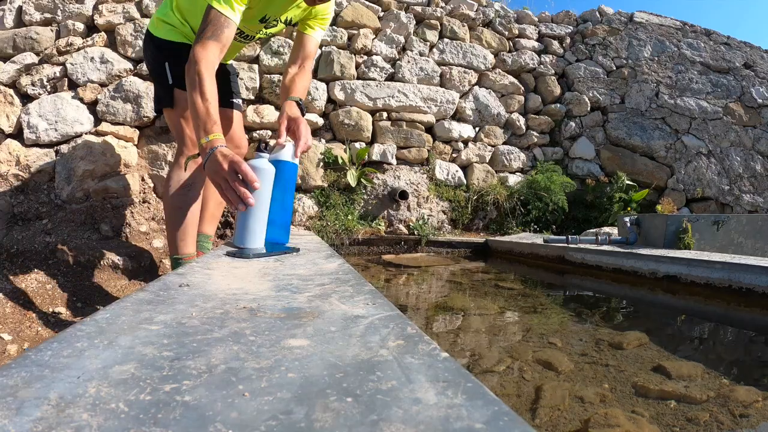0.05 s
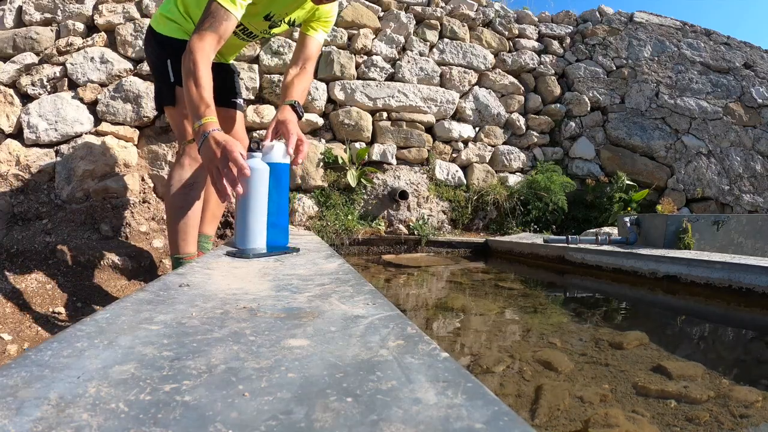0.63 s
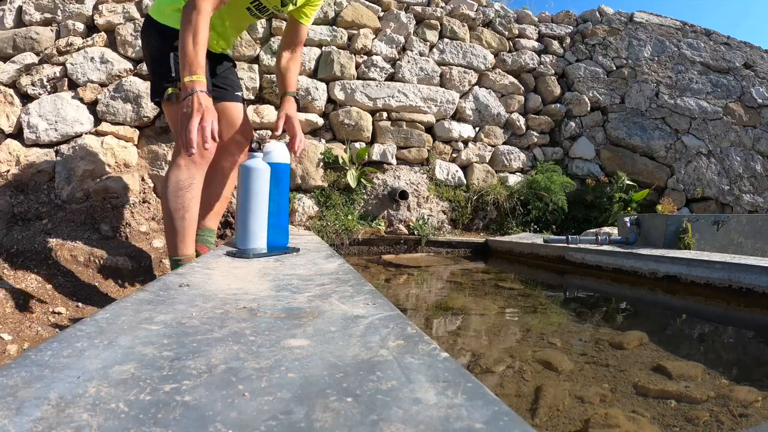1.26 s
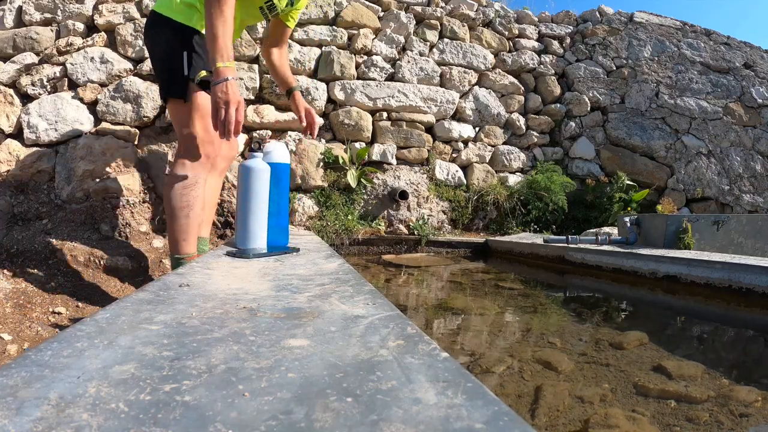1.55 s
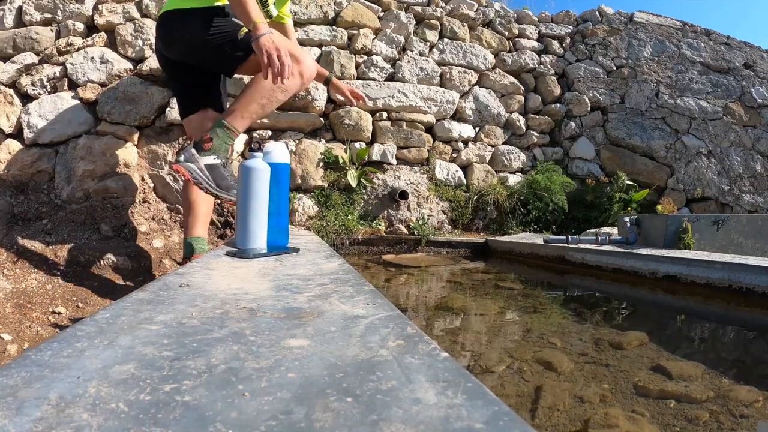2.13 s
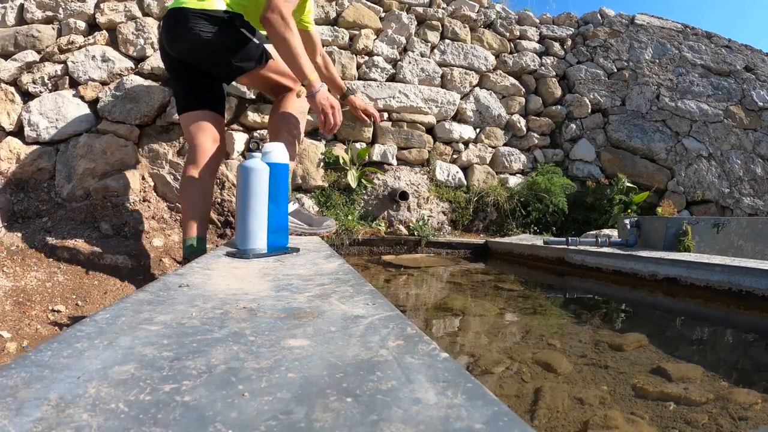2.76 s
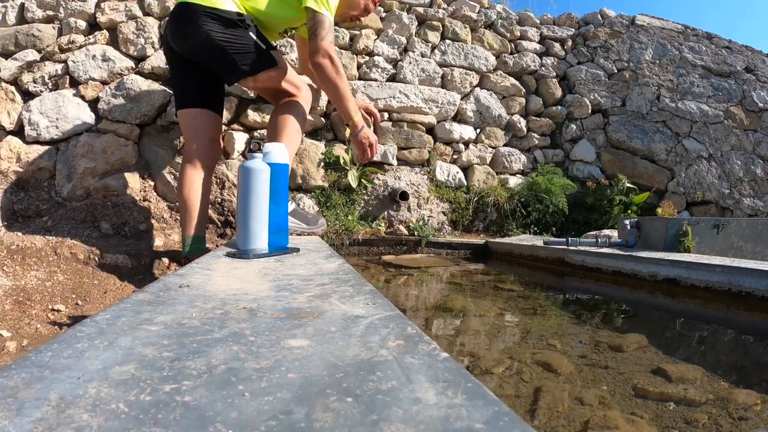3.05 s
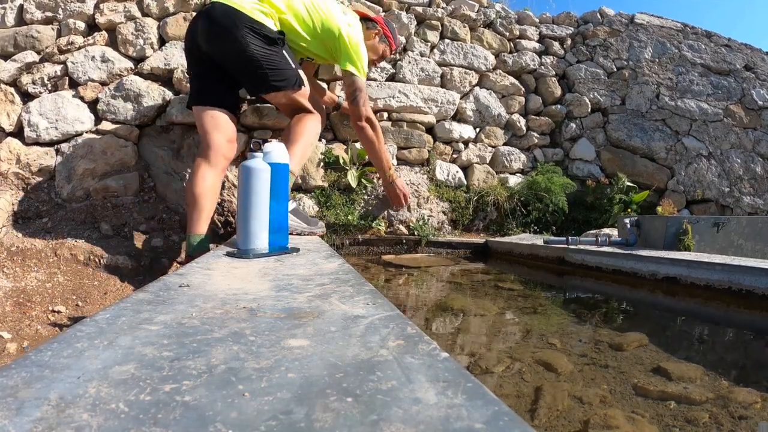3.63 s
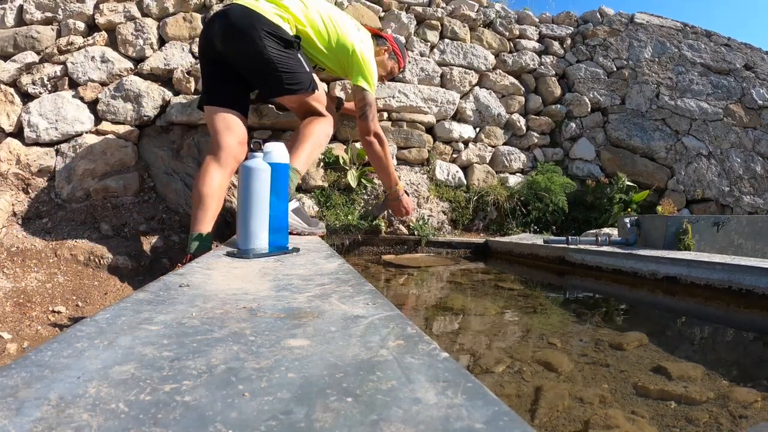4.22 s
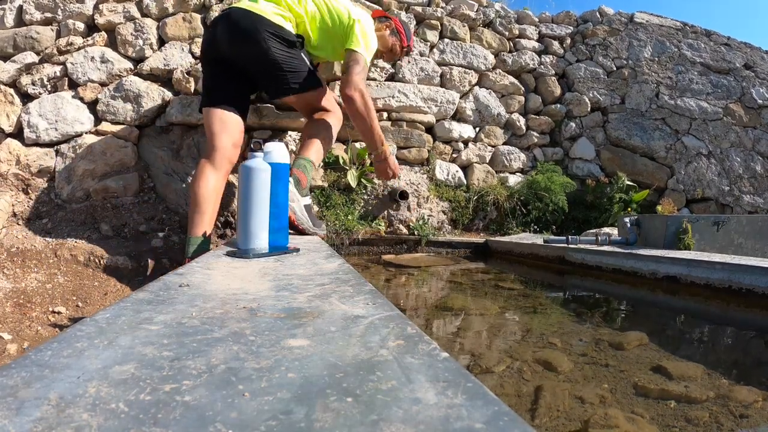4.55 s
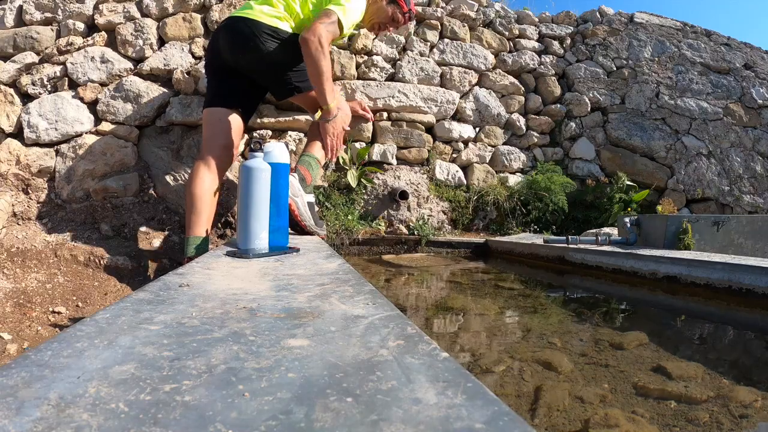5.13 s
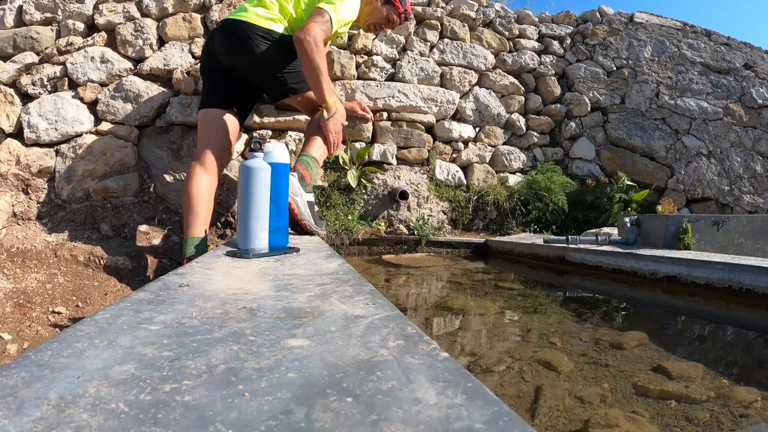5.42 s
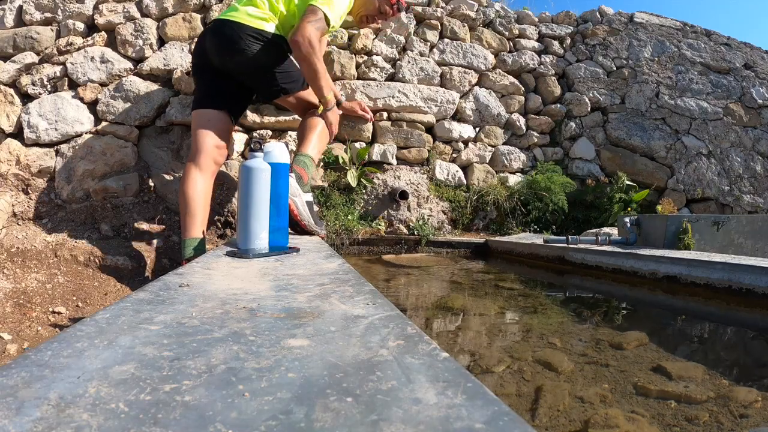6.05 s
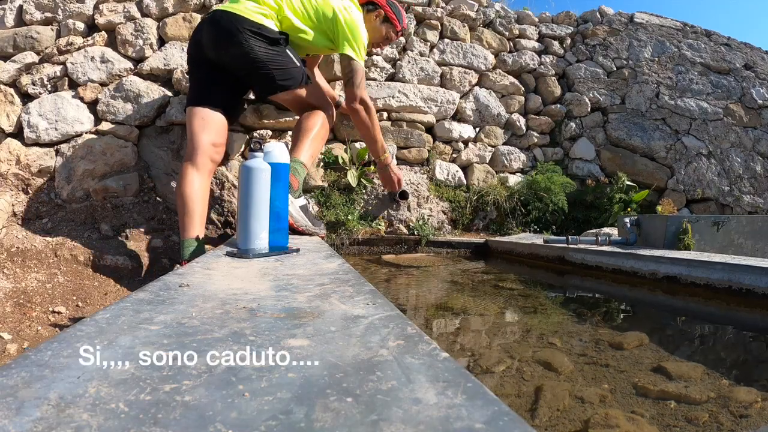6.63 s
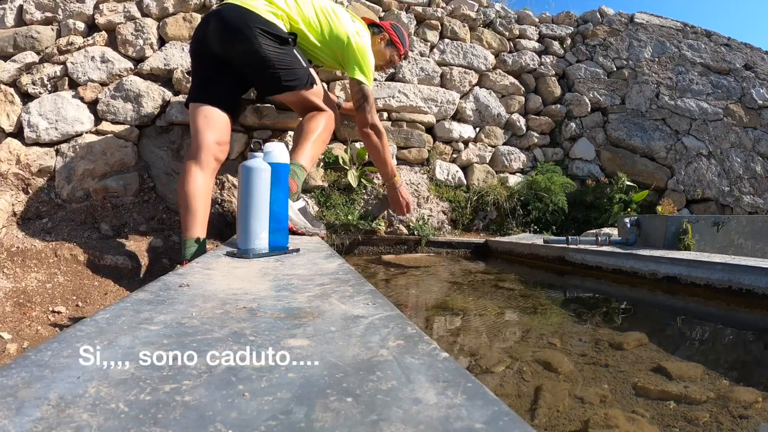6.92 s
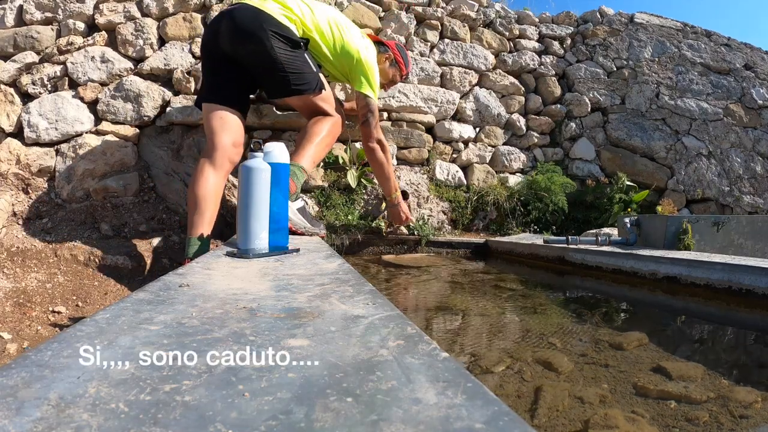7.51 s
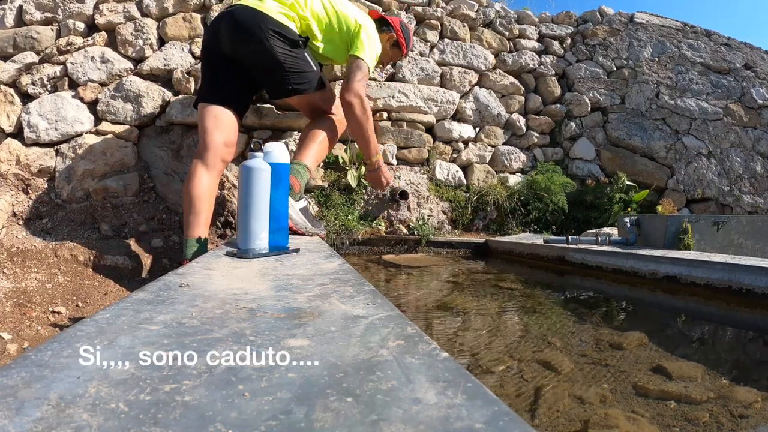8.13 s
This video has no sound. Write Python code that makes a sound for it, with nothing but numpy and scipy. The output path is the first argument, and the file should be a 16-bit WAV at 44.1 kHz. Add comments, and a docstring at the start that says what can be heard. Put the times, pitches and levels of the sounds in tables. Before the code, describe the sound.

Bottles knock and clink outdoors, then a thin stream splashes into a pool, twice interrupted by a cupped hand.

```python
"""A spring spouts from a stone wall into a basin: trapped air gurgles, drops plop, tiny bubbles fizz.
Twice the stream smacks into a cupped hand and sinks to a dribble.
At the start a bottle is set on the basin's rim, clinks against a second one and rocks. Later a shoe
scuffs, and there are two short squeaks over dull thuds, the second with a faint repeat.
Light wind buffets the microphone, which stands on the rim."""
import sys
import numpy as np
from scipy import signal
from scipy.fft import rfft, irfft, next_fast_len
from scipy.io import wavfile
from scipy.ndimage import map_coordinates

SR = 44100
rng = np.random.default_rng(int(sys.argv[2]) if len(sys.argv) > 2 else 0)


def store_wav(level_fs):
    """Save 16-bit WAV to argv[1]."""
    pcm = np.round(np.clip(np.atleast_2d(level_fs), -1, 1) * 32767)
    wavfile.write(sys.argv[1], SR, pcm.T.astype(np.int16))


N = 369116
T = np.arange(N) / SR

# Levels in the tables are relative: the functions add gains of their own.
# the stream falls freely on the pool: start_s, end_s, level_db
FREE_POURS = [(-.3, 3.766, -55.5), (4.64, 6.9, -55), (8.31, 8.6, -57)]
# the jet falters for a moment: middle_s, change_db
JET_LULLS = [(.88, -7.5), (1.247, -15.5), (2.01, -13), (2.659, -3)]
# tone colour of the splash: frequency_hz, level_db
SPLASH_COLOUR = [(250, -18.5), (450, 4.5), (900, 7.5), (1500, -3.5), (2400, 4), (3500, 0.5), (5000, -3.5),
                 (6500, -9), (7900, -15.5), (9500, -18), (12000, -43), (15500, -68)]
# tone colour of the spray and of the fine hiss: frequency_hz, level_db
HISS_COLOUR = [(1000, -24), (4000, 0.5), (7000, 11.5), (8200, 4.5), (10000, 2.5), (13000, -6),
               (15500, -12.5)]
# a fine, high hiss swells and fades: start_s, length_s, level_db
HISS_SWELLS = [(2.4, 0.2, -68), (2.93, 0.091, -63), (4.49, 0.2, -65), (4.87, 0.45, -68.5),
               (5.3, 0.39, -68.5), (5.8, 0.45, -65), (8.1, 0.52, -75)]
# air pockets close under the jet: start_s, length_s, level_db, first_pitch_hz, last_pitch_hz
AIR_POCKETS = [(0.233, 0.041, -51, 446, 920), (0.362, 0.021, -36.5, 727, 1080),
               (0.753, 0.02, -39, 750, 990), (0.801, 0.054, -46, 526, 1050), (1.12, 0.025, -44.5, 418, 516),
               (1.154, 0.039, -42, 455, 1110), (1.301, 0.023, -48, 549, 1110),
               (1.406, 0.052, -49, 449, 843), (1.485, 0.072, -45.5, 553, 943),
               (1.674, 0.051, -45, 447, 1100), (1.814, 0.035, -49, 440, 1020), (2.16, 0.04, -43, 448, 1030),
               (2.23, 0.042, -49.5, 556, 850), (2.395, 0.042, -47.5, 413, 900),
               (2.742, 0.03, -44, 652, 910), (3.098, 0.041, -39, 394, 486), (3.448, 0.031, -41.5, 408, 423),
               (3.535, 0.031, -43, 628, 1070), (3.667, 0.017, -41, 715, 1110),
               (4.614, 0.045, -41.5, 436, 1120), (4.763, 0.056, -43.5, 404, 1300),
               (4.844, 0.019, -43.5, 635, 865), (4.916, 0.08, -43, 435, 1010),
               (5.015, 0.018, -46, 764, 1090), (5.154, 0.045, -55, 406, 431.4),
               (5.262, 0.041, -61, 554, 1170), (5.393, 0.057, -53.5, 404, 1330),
               (5.455, 0.0225, -45.5, 443, 470), (5.645, 0.041, -52, 510, 945),
               (5.771, 0.022, -38.5, 710, 1115), (5.867, 0.03, -47.5, 598, 860),
               (6.062, 0.043, -49, 439, 980), (6.205, 0.09, -54, 427, 824), (6.307, 0.081, -45.5, 572, 830),
               (6.429, 0.017, -45, 423, 620), (6.511, 0.055, -43, 426, 960),
               (6.664, 0.022, -51.5, 660, 1100), (6.854, 0.087, -50.5, 486, 1010),
               (8.181, 0.065, -51.5, 411, 613), (8.255, 0.057, -46, 450, 870),
               (8.296, 0.046, -36.5, 412.4, 910)]
# big drops hit the pool: start_s, level_db, pitch_hz, splat_db
BIG_DROPS = [(0.211, -38, 2450, -33.5), (0.303, -32, 4040, -62), (0.339, -34, 2390, -51),
             (0.756, -35, 900, -47), (0.941, -28, 5700, -49), (0.981, -30.5, 822, -35.5),
             (1.082, -32.5, 2290, -64), (1.357, -31.5, 5000, -58), (1.456, -28.5, 662, -50),
             (1.559, -32.5, 2300, -63), (1.569, -27, 1120, -60), (1.572, -37, 2190, -56),
             (1.576, -32.5, 1410, -56), (1.664, -31.5, 5880, -40), (1.741, -33, 3230, -54),
             (1.799, -31.5, 2480, -41), (1.822, -26, 3050, -34.5), (1.873, -34, 925, -38),
             (1.966, -31, 1014, -56), (2.128, -30, 5800, -36), (2.39, -35, 814, -54),
             (2.445, -28.5, 2680, -57), (2.479, -34, 2280, -37), (2.537, -29, 2300, -57),
             (2.587, -34, 1470, -35), (2.836, -30, 2900, -57), (3.254, -34.5, 3900, -36.5),
             (3.439, -29.5, 3030, -62), (3.773, -28, 2470, -45), (4.613, -24, 3040, -39),
             (4.683, -36.5, 880, -63), (4.788, -30.5, 3800, -56), (4.886, -27, 2590, -47),
             (4.938, -35, 5140, -54), (4.959, -28, 1640, -52), (5.28, -40, 820, -32.5),
             (5.386, -31, 2370, -43), (5.418, -31, 4080, -50), (5.537, -33.5, 827, -54),
             (5.575, -35, 2230, -60), (5.766, -26.5, 1600, -42), (5.931, -39, 1020, -35.5),
             (6.105, -26, 960, -68), (6.187, -34.5, 3040, -55), (6.246, -25.5, 3960, -30.5),
             (6.312, -34.5, 4100, -61), (6.332, -30.5, 2360, -59), (6.429, -33, 1190, -60),
             (6.436, -33.5, 1970, -64), (6.456, -31.5, 2330, -60), (6.479, -31.5, 1980, -58),
             (6.582, -37, 2330, -57), (6.704, -26.5, 2050, -65), (6.728, -33, 980, -62),
             (6.758, -32, 2170, -62), (6.794, -24.5, 2380, -58), (6.847, -24.5, 4050, -56),
             (6.863, -33.5, 2320, -61), (6.963, -32.5, 2300, -34.5), (7.168, -38.5, 1250, -45.5),
             (7.184, -31, 3535, -48), (8.123, -31, 5410, -49), (8.177, -35, 2410, -36),
             (8.191, -33.5, 3100, -46), (8.211, -29.5, 5140, -43)]
# short wet pops with a splutter, mostly as the hand meets the stream:
# start_s, level_db, pitch_hz, ring_cycles, splutter_db
WET_SMACKS = [(3.696, -32, 1130, 2, -42), (3.701, -26, 1690, 1, -35), (3.731, -26, 1130, 1.3, -38),
              (3.759, -25, 1090, 1.3, -34), (3.775, -28, 1380, 1, -36), (3.809, -10.5, 1410, 0.79, -37.5),
              (3.823, -22, 2100, 0.88, -43), (3.853, -17, 2050, .7, -49), (3.866, -23.5, 2000, 0.8, -41),
              (3.885, -13, 1830, 0.62, -40), (3.899, -14.5, 1040, 1.2, -37.5), (3.95, -24, 1060, 1.1, -41),
              (4.53, -25, 1270, 1.64, -62), (5.821, -30, 890, 1.7, -38.5), (7.004, -28.5, 980, 2.4, -35),
              (7.047, -44, 990, 2, -38), (7.057, -39.5, 990, 4.3, -46)]
# tone colour of the splutter after a smack: frequency_hz, level_db
SPLUTTER_COLOUR = [(300, -17), (650, -2.5), (1100, 0.5), (1700, -10.5), (2400, -4.5), (3500, -13),
                   (6000, -27), (12000, -54)]
# single drips get past the hand: start_s, level_db, pitch_hz, ring_cycles
HAND_DRIPS = [(4.136, -42.5, 2720, 18), (4.303, -52, 1960, 11), (4.407, -55, 1760, 5),
              (7.341, -53.5, 5980, 8.2), (7.502, -61, 5360, 15), (7.585, -53.5, 3520, 22),
              (7.716, -57, 3900, 11), (7.746, -42.5, 4560, 16), (7.775, -50.5, 4580, 13),
              (7.795, -55, 3630, 8.1), (7.905, -56.5, 2090, 14), (7.932, -47, 793, 17)]

# the bottle lands and settles on its edge: start_s, ring_db, thud_db, crack_db
BOTTLE_LANDINGS = [(.028, -15, -18, -17), (.062, -26, -34.5, -38.5), (.09, -32.5, -33.5, -51.5)]
# notes of the bottle on the rim: pitch_hz, level_db, fade_s (the time to fall by 60 dB)
BOTTLE_NOTES = [(172, 2, .13), (232, -5, .16), (280, -12, .5), (319, -9, .3), (366, -7.5, .27),
                (428, -8, .32), (468, -4, .3), (501, -4.5, .33), (531, -9, .26), (591, -13, .3),
                (743, -10, .25), (807, -13, .3), (1135, -13, .15), (1242, -12, .18), (2078, -21, .16),
                (2374, -20, .16), (5249, -29.5, .12)]
# notes of bottle against bottle: pitch_hz, level_db, fade_s
CLINK_NOTES = [(178, -20, 0.39), (253, -4, 1.32), (379, -16, 1.6), (1180, -19.5, 1.1), (2560, -26, 0.61),
               (3250, -18, 0.37)]
# tone colour of a blow's thud: frequency_hz, level_db
THUD_COLOUR = [(40, -28), (170, -3), (420, 1.5), (800, -8), (1600, -14.5), (3000, -17.5), (6000, -35.5),
               (10000, -45.5), (15000, -61)]
# how long the thud lasts: frequency_hz, fade_s
THUD_FADE = [(100, 0.082), (450, 0.43), (1200, .16), (3000, 0.12), (10000, 0.081)]
# tone colour of the rim's dull boom: frequency_hz, level_db
BOOM_COLOUR = [(30, -35.5), (70, -7.5), (110, 0), (170, -3), (260, -10), (450, -16.5), (900, -27),
               (2500, -43), (8000, -85)]
# how long the boom lasts: frequency_hz, fade_s
BOOM_FADE = [(100, 3.8), (200, 1), (500, 1.4), (2000, 0.59)]
# the bottles touch as they rock: start_s, level_db
BOTTLE_TOUCHES = [(0.396, -33.5), (0.433, -38.5), (0.475, -42), (.492, -41.5), (0.56, -35.5),
                  (0.612, -36.5)]
# the clink's main note wavers: time_s, level_db
CLINK_LEVEL = [(.396, -140), (.402, -44), (.425, -35), (.47, -34.5), (.508, -41), (.53, -55), (.553, -41),
               (.575, -43), (.598, -52), (.62, -43.5), (.655, -44), (.695, -59), (.73, -56), (1.7, -140)]
# squeaks: start_s, level_db, lower_pitch_hz, upper_over_lower_db, thud_db, thud_pitch_hz
SQUEAK_EVENTS = [(4.841, -26, 1488, -4.5, -28.5, 135), (6.611, -27.5, 1474, 2, -28.5, 119.6),
                 (6.777, -40.5, 1455, -10, -54, 121.6)]
# a squeak's tone and overtones: pitch_multiple, level_db
SQUEAK_HARMONICS = [(1, 0), (2, -3), (3, -13), (4, -21)]
# a sole scuffs on grit: start_s, length_s, level_db
SOLE_SCUFFS = [(2.73, 0.015, -48), (2.923, 0.088, -48.5), (3.017, 0.071, -50), (3.149, 0.014, -39.5)]

# the breeze dies down and briefly returns: time_s, level_db
BREEZE_LEVEL = [(0, -27.5), (.45, -39), (.95, -32.5), (1.22, -36.5), (1.5, -36.5), (2.9, -38.5), (3.2, -43),
                (4.1, -40.5), (4.4, -59.5), (4.55, -42.5), (5.3, -50), (6.2, -78), (7.85, -76),
                (8.0, -47.5), (8.37, -49)]
# gusts on top of the breeze: start_s, length_s, level_db
WIND_GUSTS = [(.94, 0.18, -28), (2.5, 0.29, -40), (3.47, 0.16, -32.5), (3.69, .1, -34), (4.12, 0.13, -32),
              (8.15, 0.19, -37)]
# tone colour of wind on the microphone: frequency_hz, level_db
WIND_COLOUR = [(10, -2), (25, 1), (60, 3.5), (110, -6.5), (170, -14), (260, -30.5), (450, -42.5),
               (1200, -100)]
# low bumps of air and footing: start_s, level_db, pitch_hz, puff_db
LOW_BUMPS = [(1.009, -19, 121, -45), (1.035, -21, 109, -45), (1.057, -18, 62, -51),
             (1.118, -16, 78.5, -26.5), (1.298, -18.5, 134, -33), (1.767, -27, 104, -36.5),
             (2.251, -14.5, 157, -26), (2.281, -19, 117, -32.5), (2.751, -23.5, 121, -46),
             (2.856, -24, 119, -27), (3.075, -31, 187, -30), (3.426, -26, 126, -42),
             (3.677, -14.5, 101, -23.5)]
# a rustle during a step over the rim: time_s, level_db
RUSTLE_LEVEL = [(2.4, -78), (2.55, -43), (2.75, -43), (2.83, -46), (2.865, -38), (2.93, -42), (2.98, -46.5),
                (3.1, -43.5), (3.22, -47), (3.6, -65)]
# tone colour of the quiet background air: frequency_hz, level_db
AIR_COLOUR = [(15, -33.5), (25, 13.5), (178, 1), (457, -31.5), (582, -16.5), (804, -31), (1450, -19.5),
              (2770, -31), (3340, -31.5), (5880, -21.5), (15500, -49)]
# the stereo sound widens late: time_s, width (0 to 1)
STEREO_WIDTH = [(5.6, 0), (6.6, .65), (8.0, 1)]
# narrow bands that the microphone's opening weakens: centre_hz, width_hz, change_db
MICROPHONE_DIPS = [(2766, 97, -8.5), (3540, 160, -2), (4610, 170, -4), (8340, 260, -5.5)]


def stream():
    """The falling jet makes bubbles, spatters, ticks and fizz; each spatter throws a puff of spray."""
    small = bubble_cloud(clumps=1100, low_hz=1900, high_hz=6890, cycles=6, spread_db=4, clump_s=.004)
    large = bubble_cloud(clumps=220, low_hz=520, high_hz=2000, cycles=3.2, spread_db=1.5, clump_s=.008)
    bursts = patter(count=420, spread_db=4.5, rise_s=.004, fall_s=.0024)
    ticks = patter(count=70, spread_db=4, rise_s=.0002, fall_s=.0005)
    spatter = (amp(-3.5) * bursts + amp(-19) * ticks) * noise(SPLASH_COLOUR)
    fizz = noise(SPLASH_COLOUR) * amp(.67 * wobble(40))
    puffs = amp(-22) * (bursts + ticks) * noise(HISS_COLOUR)
    water = amp(-.5) * small + amp(-3) * large + spatter + amp(-8) * fizz + puffs
    flow = amp(flow_db(T) + 1.5 * wobble(5.9))  # the jet surges slowly
    spray_level = amp(-29.5) * flow
    # one high noise serves both the spray and the separate swells of hiss
    hiss = (spray_level + swells(HISS_SWELLS)) * amp(5.3 * wobble(97)) * noise(HISS_COLOUR)
    return flow * water + hiss


def flow_db(t, dribble_db=-86, release_s=.25, catch_s=.47, half_lull_s=.03):
    """The splash swells as the hand lets go, dips in lulls and sinks as the hand catches the stream."""
    pours = []
    for start, end, db in FREE_POURS:
        times = [start - release_s, start, end, end + catch_s]
        pours.append(np.interp(t, times, [dribble_db, db, db, dribble_db]))
    lulls = sum(db * np.exp(-((t - s) / half_lull_s) ** 4) for s, db in JET_LULLS)
    return np.max(pours, axis=0) + lulls


def bubble(t, hz, cycles, rise):
    """A bubble swells within a cycle, rings for some cycles and rises in pitch as it nears the surface."""
    age = hz * t / cycles
    phase = 2 * np.pi * cycles * (age + rise * (age - 1 + np.exp(-age)))
    return np.sin(phase) * np.exp(-age) * (1 - np.exp(-2 * hz * t))


def bubble_cloud(clumps, low_hz, high_hz, cycles, spread_db, clump_s):
    """Bubbles ring at random times, in clumps of four of similar pitch."""
    t = T[:int(30 * SR / low_hz)]
    clump_start = np.repeat(rng.uniform(0, N / SR, clumps), 4)[:, None]
    start = clump_start + clump_s * rng.exponential(size=(4 * clumps, 1))
    clump_hz = np.repeat(low_hz * (high_hz / low_hz) ** rng.random(clumps), 4)[:, None]
    hz = clump_hz * np.exp(.188 * rng.standard_normal(start.shape))
    random_db = spread_db * np.clip(rng.standard_normal(start.shape), -2, 1.5)
    strength = hz * amp(along(SPLASH_COLOUR, hz) + random_db)
    ring_cycles = cycles * 2 ** rng.uniform(-1.1, 1, start.shape)
    rings = strength * bubble(t, hz, ring_cycles, rise=.01) * (1 - t / t[-1])
    index = (start * SR).astype(int) + np.arange(len(t))
    return unit(np.bincount(index.ravel(), rings.ravel(), N)[:N])  # add each ring at its own time


def gurgles():
    """An air pocket shrinks ever faster, so its note slides up, shaken by the falling water."""
    out = np.zeros(N)
    for s, length, db, first_hz, last_hz in AIR_POCKETS:
        t = T[:int(2 * length * SR)]
        progress = np.minimum(t / length, 1)
        radius = 1 + (first_hz / last_hz - 1) * progress ** 1.8  # as a share of the starting size
        pitch = first_hz / radius
        jitter = 1 + .047 * wobble(300, SR)[:len(t)]
        phase = 2 * np.pi * np.cumsum(pitch * jitter) / SR
        flutter = amp(3 * wobble(130, SR)[:len(t)])
        note = (np.sin(phase) + amp(-17) * np.sin(2.2 * phase)) * flutter
        swell = (1 - np.exp(-t / .003)) / (1 + (t / length) ** 16)
        sag = amp(-6.5 * np.sin(np.pi * progress) ** 2)  # loudest as the pocket closes and as it bursts
        add(out, s, amp(db) * swell * sag * unit(note))
        # the pocket sheds three short glugs near its own note
        for when, detune, strength in rng.random((3, 3)):
            hz = np.interp(when * length, t, pitch) * 2 ** (.8 * detune - .2)
            glug = bubble(T[:SR // 20], hz, cycles=3.5, rise=.06)
            add(out, s + when * length, amp(db + 1.5 + 6 * strength) * glug)
    return out


def drops():
    """Each drop slaps the surface, traps a ringing bubble and throws a short, bright splat."""
    out, t = np.zeros(N), T[:SR // 12]
    splat_colour = [(300, -17), (900, -5.5), (2500, -5), (6300, -6), (9000, -6), (15000, -27.5)]
    for s, db, hz, splat_db in list(BIG_DROPS) + small_drops():
        ring = bubble(t, hz, cycles=11.6, rise=.018) * amp(2.5 * wobble(500, len(t)))
        ring *= burst(t, rise_s=.0007, fall_s=.013)
        slap_colour = [(hz / 4, -25), (hz / 1.96, -4), (hz, 0),
                       (hz * 2, -5), (hz * 4, -19), (hz * 10, -55)]
        slap = noise_burst(slap_colour, t, rise_s=.0021, fall_s=.0045)
        splat = noise_burst(splat_colour, t, rise_s=.0039, fall_s=.0062) * amp(4 * wobble(700, len(t)))
        add(out, s, amp(db - 3) * ring + amp(db - 8.5) * slap + amp(splat_db - 1) * splat)
    # water is a soft target: little sound is left above the pitch of the smallest bubbles
    softness = [(6600, 2.5), (8000, -9), (12000, -20), (15500, -24)]
    return filtered(out, lambda hz: amp(along(softness, hz)))


def small_drops(per_s=5, typical_hz=2400):
    """Random lesser drops whose strength follows the flow, listed like BIG_DROPS."""
    gap, strength, detune = rng.uniform(-1, 1, (200, 3)).T
    starts = np.cumsum(1 + gap) / per_s
    levels = flow_db(starts) + 22 + 2 * strength
    pitches = typical_hz * 2 ** (.87 * detune)
    return [(s, db, hz, db - 18) for s, db, hz in zip(starts, levels, pitches) if s < N / SR]


def smacks():
    """Trapped air gives short wet pops with a splutter, mostly as the hand meets the stream."""
    out, t = np.zeros(N), T[:SR // 10]
    for s, db, hz, cycles, splutter_db in WET_SMACKS:
        pop = bubble(t, hz, cycles, rise=.05)
        splutter = noise_burst(SPLUTTER_COLOUR, t, rise_s=.001, fall_s=.0079)
        add(out, s, amp(db + 2) * pop + amp(splutter_db + .5) * splutter)
    return out


def drips():
    """While the stream is held, single drips fall on still water: a soft ring and a tiny splash."""
    out, t = np.zeros(N), T[:SR // 6]
    colour = [(800, -23), (3000, .5), (6000, 1), (8000, -9.5), (15000, -35)]
    for s, db, hz, cycles in HAND_DRIPS:
        ring = bubble(t, hz, cycles, rise=.012) * burst(t, rise_s=.00062, fall_s=.063)
        splash = noise_burst(colour, t, rise_s=.0015, fall_s=.0055)
        add(out, s, amp(db + .5) * (ring + amp(-12.5) * splash))
    return out


def spits():
    """Faint, uneven spits escape at the spout, even past the hand."""
    colour = [(2000, -14), (5500, 0), (8000, -7), (9800, -1), (15000, -16)]
    return amp(-87) * patter(count=110, spread_db=4, rise_s=.003, fall_s=.005) * noise(colour)


def bottle_blows():
    """The bottle lands, settles, then taps its neighbour; the rim booms under both main blows."""
    out, t = np.zeros(N), T[:SR // 10]
    land_s, tap_s = .028, .398
    for notes, blows in [(BOTTLE_NOTES, BOTTLE_LANDINGS), (CLINK_NOTES, [(tap_s, -30.5, -47, -34)])]:
        for s, ring_db, thud_db, crack_db in blows:
            add(out, s, amp(ring_db) * ringing(notes))
            add(out, s, amp(thud_db) * fading(THUD_COLOUR, THUD_FADE))
            add(out, s, amp(crack_db) * noise_burst(SPLASH_COLOUR, t, rise_s=.00053, fall_s=.0038))
    for s, boom_db in [(land_s, -29), (tap_s, -27)]:
        add(out, s, amp(boom_db) * fading(BOOM_COLOUR, BOOM_FADE))
    return out


def ringing(notes):
    """A struck bottle rings with several notes, each dying at its own speed."""
    t = T[:2 * SR]
    ring = sum(amp(db - 60 * t / fade_s) * np.sin(2 * np.pi * (hz * t + rng.random()))
               for hz, db, fade_s in notes)
    return ring * (1 - np.exp(-t / .002))


def bottle_rocking(pitch_hz=1680):
    """One bottle rocks against the other: its main note swells and wavers, and each touch ticks."""
    out, t = np.zeros(N), T[:SR // 20]
    colour = [(500, -4), (2000, 8.5), (6000, 3), (8000, -9), (10000, -14), (15000, -25)]
    for s, db in BOTTLE_TOUCHES:
        add(out, s, amp(db) * noise_burst(colour, t, rise_s=.0005, fall_s=.0039))
    return out + amp(curve(CLINK_LEVEL, T)) * np.sin(2 * np.pi * pitch_hz * T)


def squeaks(upper_hz=1594):
    """Two close notes beat over a rasp of friction; a low thud swells just behind and booms on."""
    out, t = np.zeros(N), T[:SR]
    rasp_colour = [(800, -16.5), (1600, -1), (3200, 2), (4800, -6),
                   (6400, -13), (9000, -19), (15000, -50.5)]
    for s, db, lower_hz, upper_db, thud_db, thud_hz in SQUEAK_EVENTS:
        pair = squeak_note(t, lower_hz) + amp(upper_db) * squeak_note(t, upper_hz)
        # raising the pair to the power k gives a cluster of notes near k times the pitch
        tone = sum(amp(level) * unit((pair ** k).imag) for k, level in SQUEAK_HARMONICS)
        rasp = unit(abs(pair)) * noise(rasp_colour, SR)
        add(out, s, amp(db) * (tone + amp(-13) * rasp) * burst(t, rise_s=.0095, fall_s=.03))
        thud = np.sin(2 * np.pi * thud_hz * t + 1.77 * wobble(44.1, SR))
        thud *= burst(t, rise_s=.024, fall_s=.14)
        boom = filtered(fading(BOOM_COLOUR, BOOM_FADE), lambda hz: 1 / (1 + (hz / 230) ** 4))
        boom *= burst(t, rise_s=.009, fall_s=.3)
        add(out, s, amp(thud_db) * (thud + amp(-7.5) * boom))
    return out


def squeak_note(t, hz):
    """A rough note starts a little high and settles; its wave is given as complex numbers."""
    pitch = hz * (1 + .042 * np.exp(-t / .012) + .029 * wobble(900, len(t)))
    return np.exp(2j * np.pi * np.cumsum(pitch) / SR)


def scuffs():
    """Grit slides under a sole: a bright, grainy hiss."""
    out, t = np.zeros(N), T[:SR // 3]
    colour = [(400, 1), (2000, -1), (6000, -8), (10000, -13), (13000, -34), (15500, -32.5)]
    for s, length, db in SOLE_SCUFFS:
        grit = unit(noise(colour, len(t)) * amp(1.4 * wobble(700, len(t))))
        add(out, s, amp(db + 5) * grit * burst(t, rise_s=length / 3, fall_s=length))
    return out


def dull_knock(start_s=7.172):
    """One soft knock near the spout leaves a short, dark tail."""
    out = np.zeros(N)
    colour = [(60, -26), (190, -1), (330, -30), (700, -11.5), (1400, -10.5), (4000, -35), (12000, -48)]
    add(out, start_s, amp(-43) * fading(colour, fade_times=[(200, .45), (1200, .18), (5000, .13)]))
    return out


def wind():
    """A dying breeze and a few gusts buffet the microphone with a lumpy rumble."""
    strength = amp(curve(BREEZE_LEVEL, T)) + swells(WIND_GUSTS)
    return strength * unit(noise(WIND_COLOUR) * amp(2.3 * wobble(14)))


def bumps():
    """Air and footing make low bumps: each is a very short, deep ring with a puff of air."""
    out, t = np.zeros(N), T[:SR // 4]
    colour = [(40, 0), (200, 4), (330, -11), (650, -13.5), (1500, -32), (4000, -81)]
    for s, db, hz, puff_db in LOW_BUMPS:
        puff = noise_burst(colour, t, rise_s=.0022, fall_s=.018)
        add(out, s, amp(db + 9.5) * bubble(t, hz, cycles=.54, rise=.11) + amp(puff_db) * puff)
    return out


def rustle():
    """A step over the rim brings a broad, crunchy rustle."""
    rush = noise([(60, -23), (160, 11.5), (350, -2), (700, -12),
                  (1500, -17), (5000, -43.5), (10000, -38), (15000, -62.5)])
    crunch = unit(1 + patter(count=900, spread_db=4, rise_s=.001, fall_s=.004))
    return amp(curve(RUSTLE_LEVEL, T)) * crunch * rush


def wall_echo(sound):
    """The stone wall answers each sound with a short tail."""
    tail = fading([(200, -12), (2000, -7.5), (10000, 5)],
                  fade_times=[(200, .37), (2000, .11), (10000, .095)])
    return signal.fftconvolve(sound, tail / np.linalg.norm(tail))[:N]


def amp(db):
    """Turn decibels into a factor to multiply by."""
    return 10 ** (np.asarray(db) / 20)


def unit(x):
    """Scale a sound to an average (rms) size of 1."""
    return x / np.sqrt(np.mean(x ** 2) + 1e-20)


def along(points, hz):
    """Read between (frequency_hz, value) points, with octaves evenly spaced."""
    frequencies, values = np.transpose(points)
    return np.interp(np.log(hz + 1), np.log(frequencies), values)


def curve(rows, t):
    """Read between (time_s, value) rows at times t."""
    return np.interp(t, *np.transpose(rows))


def wobble(per_s, size=N):
    """A smooth curve through per_s random values a second."""
    points = rng.standard_normal(int(size * per_s / SR) + 4)
    return map_coordinates(points, [np.arange(size) * per_s / SR])


def burst(t, rise_s, fall_s):
    """A loudness shape that swells and dies away."""
    return (1 - np.exp(-(t / rise_s) ** 2)) * np.exp(-t / fall_s)


def swells(rows):
    """Join smooth swells (start_s, length_s, level_db) into one loudness shape."""
    return sum(amp(db) * np.sin(np.pi * np.clip((T - s) / length, 0, 1)) for s, length, db in rows)


def patter(count, spread_db, rise_s, fall_s):
    """The loudness shape of many small impacts at random times."""
    impacts = np.zeros(N)
    strengths = amp(spread_db * np.clip(rng.standard_normal(count), -2, 1.5))
    impacts[rng.integers(0, N, size=count)] = strengths
    return unit(signal.fftconvolve(impacts, burst(T[:SR // 20], rise_s, fall_s))[:N])


def filtered(x, response):
    """Multiply each frequency in a sound by response(hz)."""
    size = x.shape[-1]
    padded = next_fast_len(size + 8192)
    return irfft(rfft(x, padded) * response(np.fft.rfftfreq(padded, 1 / SR)), padded)[..., :size]


def noise(colour, size=N):
    """Noise with a tone colour given as (frequency_hz, level_db) points."""
    return unit(filtered(rng.standard_normal(size), lambda hz: amp(along(colour, hz))))


def noise_burst(colour, t, rise_s, fall_s):
    """A puff of noise that swells and dies away."""
    return noise(colour, len(t)) * burst(t, rise_s, fall_s)


def fading(colour, fade_times):
    """One second of noise in which each frequency dies at its own speed: (frequency_hz, fade_s)."""
    hz, t, bands = signal.stft(noise(colour, SR), SR, nperseg=256)
    decay = amp(-60 * t / along(fade_times, hz)[:, None])
    tail = signal.istft(bands * decay, SR, nperseg=256)[1][:SR]
    return tail * (1 - np.exp(-(T[:SR] / .0005) ** 2))  # a slightly rounded start


def add(track, start_s, sound):
    """Mix a sound into the track at the given time."""
    part = track[max(0, round(start_s * SR)):][:len(sound)]
    part += sound[:len(part)]


def scene():
    """All sources lie almost straight ahead of the microphone's left and right openings."""
    near = stream() + gurgles() + drops() + smacks() + spits() + drips()
    near += bottle_blows() + bottle_rocking() + squeaks() + scuffs() + dull_knock()
    echo = wall_echo(near)
    air = noise(AIR_COLOUR)
    middle = near + amp(-4.5) * echo + wind() + bumps() + rustle() + amp(-66.5) * air
    # the left hears slightly later and gets extra air noise; each side has its own wind and air
    left_lag_s = .000026
    lag = filtered(near, lambda hz: -1j * np.sin(np.pi * hz * left_lag_s))
    difference = lag + amp(-2) * wind() + amp(-64.5) * noise(AIR_COLOUR) + amp(-72) * air
    # the two sides hear different spray: a delayed copy of the highest treble
    treble_hz, treble_lag_s = 10620, .0011
    treble = filtered(near, lambda hz: np.exp(-2j * np.pi * hz * treble_lag_s)
                      * (1 - 1 / (1 + (hz / treble_hz) ** 20)))
    side = curve(STEREO_WIDTH, T) * difference + amp(-2.5) * treble
    return np.array([middle + side, middle - side])


def record(dry):
    """The microphone's opening weakens a few narrow bands, and nothing is kept above top_hz."""
    def response(hz, top_hz=15700):
        dips_db = sum(db * np.exp(-((hz - centre) / width) ** 2) for centre, width, db in MICROPHONE_DIPS)
        return amp(dips_db) * (hz < top_hz)
    return filtered(dry, response)


dry = scene()
out = record(dry)
store_wav(out)
```